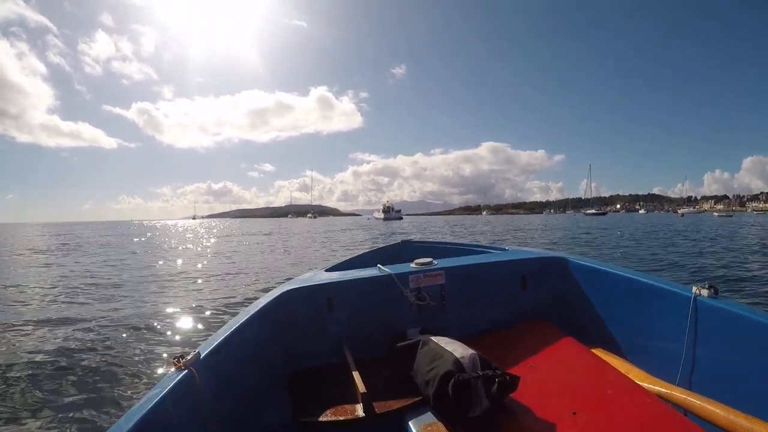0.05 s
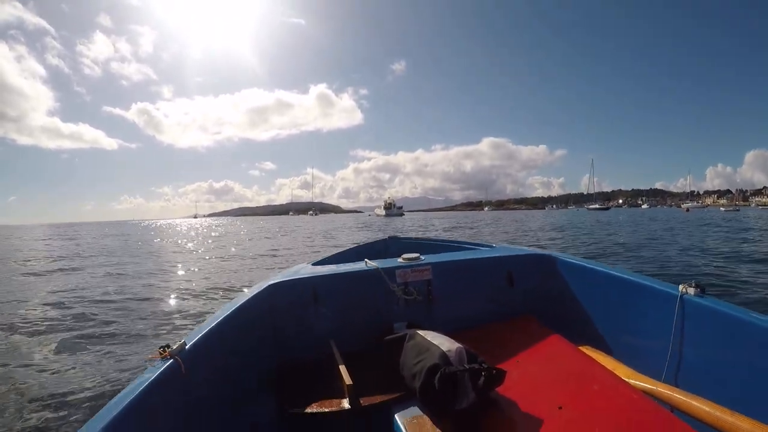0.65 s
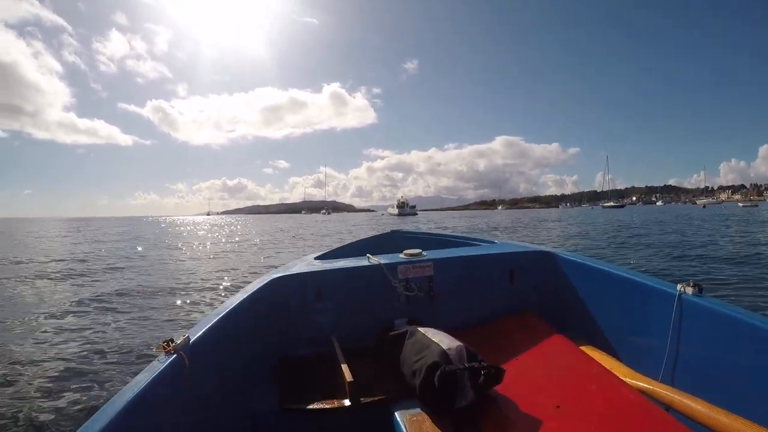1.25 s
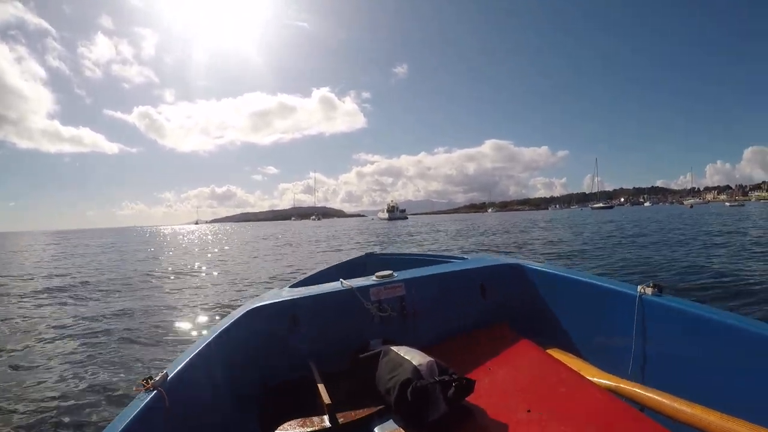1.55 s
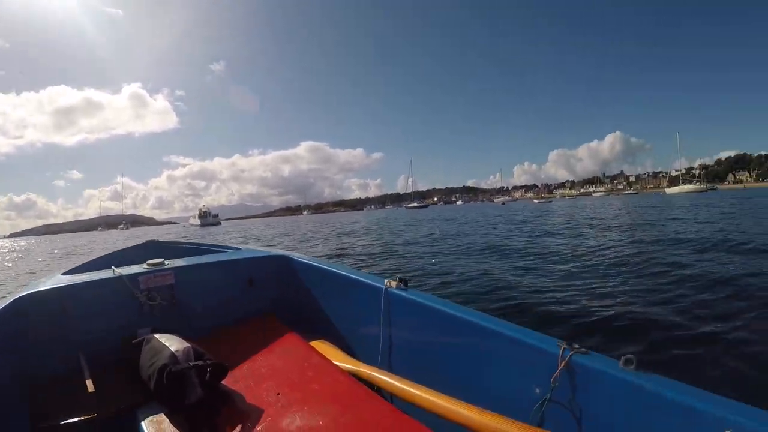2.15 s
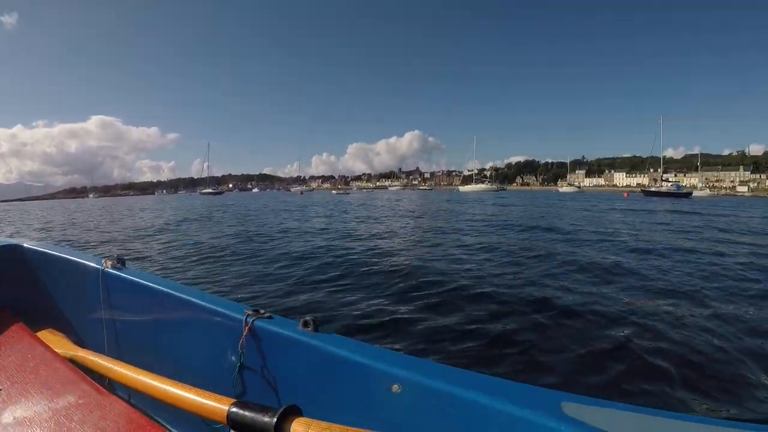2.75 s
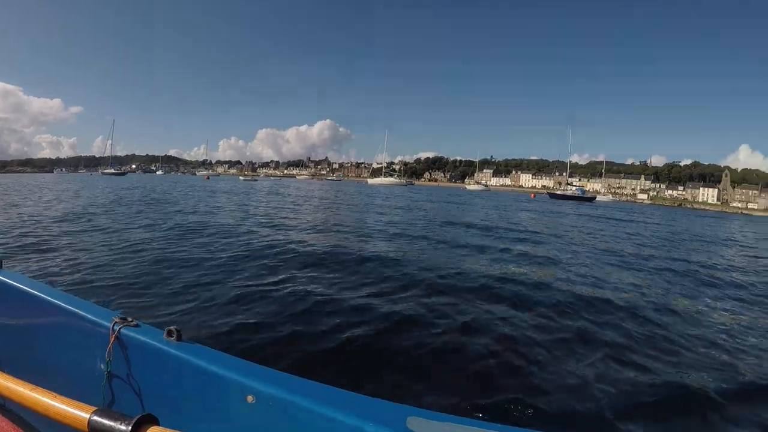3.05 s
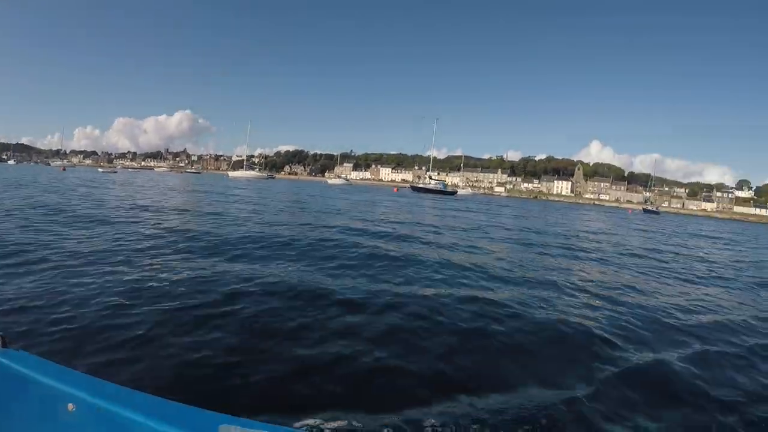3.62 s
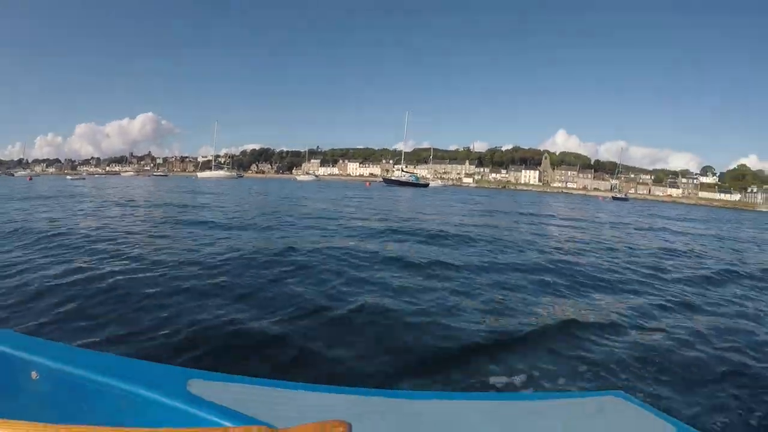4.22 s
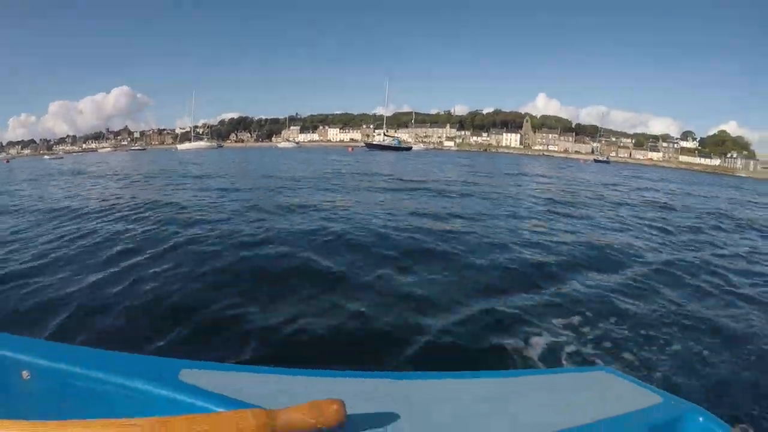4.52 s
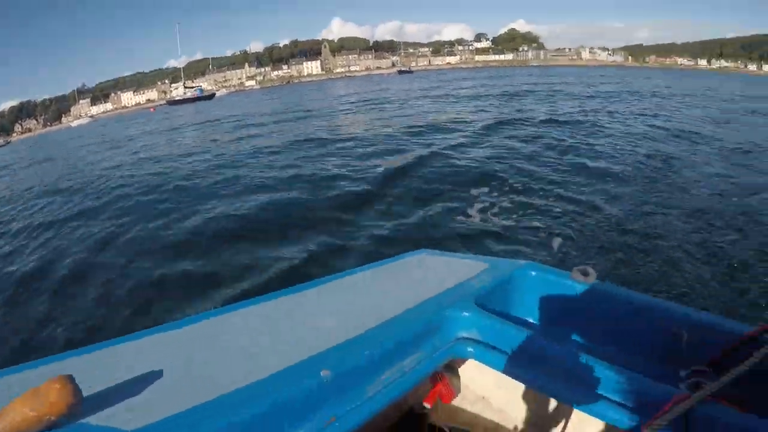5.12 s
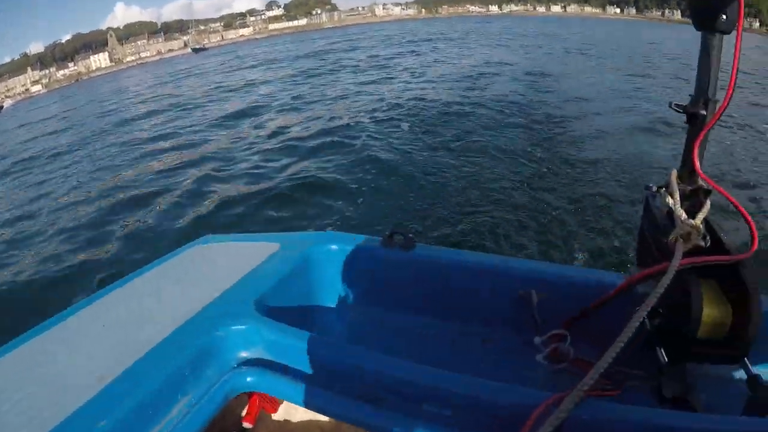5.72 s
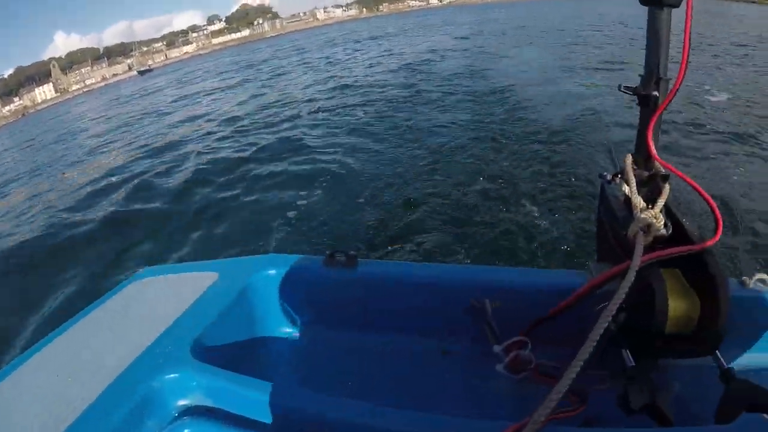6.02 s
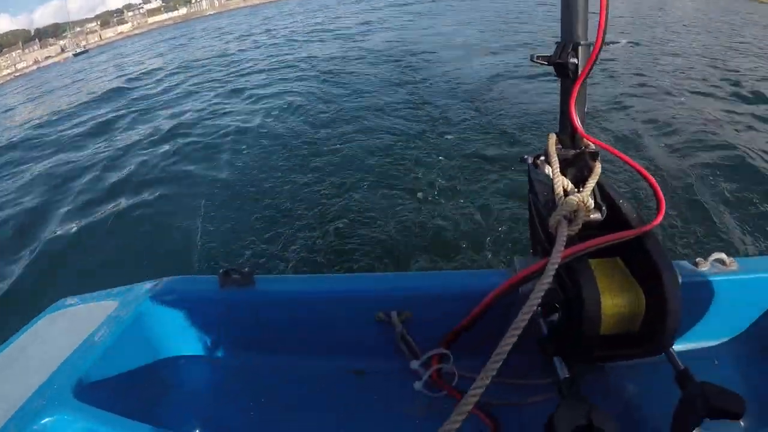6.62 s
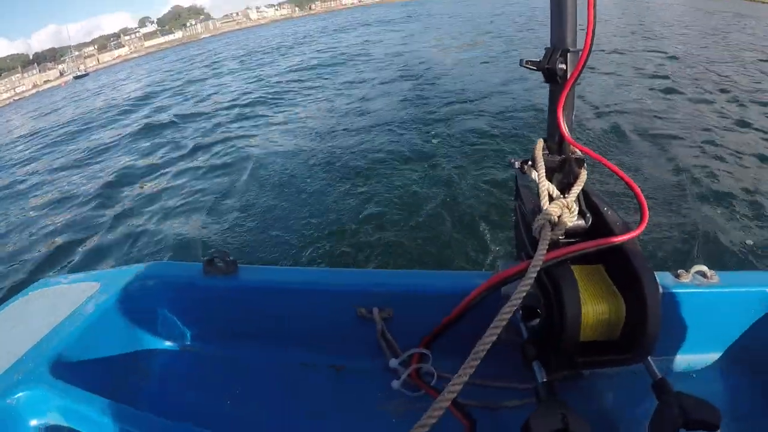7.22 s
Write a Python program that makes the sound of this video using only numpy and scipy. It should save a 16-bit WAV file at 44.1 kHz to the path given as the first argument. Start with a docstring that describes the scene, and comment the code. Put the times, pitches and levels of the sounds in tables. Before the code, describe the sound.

Water laps and plops against a dinghy over the low, pulsing hum of its electric outboard, a faint whine and gusty wind rumble.

```python
"""Electric dinghy on calm water

A dinghy glides under an electric outboard while the microphone turns from bow to stern.
The propeller sets the hull humming and throbbing, the motor whines faintly, wind rumbles on the mic.
Wavelets slap and gurgle along the hull, swells thump the bow, drops tick, the wake churns and fizzes.
The water is ringing bubbles and bands of noise; the hull answers with its resonances."""
import sys
import numpy as np
from scipy import signal
from scipy.io import wavfile
from scipy.ndimage import uniform_filter1d

SR = 44100
rng = np.random.default_rng(int(sys.argv[2]) if len(sys.argv) > 2 else 0)


def file_out(sig):
    """Save sig as 16-bit WAV at sys.argv[1]."""
    # one column per channel
    cols = np.atleast_2d(sig).T
    # limit, then scale
    lim = np.clip(cols, -1, 1)
    pcm = np.round(lim * 32767).astype(np.int16)
    wavfile.write(sys.argv[1], SR, pcm)


N = 320607
T = np.arange(N) / SR


def from_db(db):
    """Decibels to gain."""
    return 10 ** (np.asarray(db) / 20)


def rms_one(x):
    """Scale to unit rms; a stereo pair by its mid."""
    return x / np.sqrt(np.mean(np.atleast_2d(x).mean(axis=0) ** 2) + 1e-20)


def in_time(rows):
    """One per-sample curve for each column after time."""
    times, *columns = np.transpose(rows)
    return [np.interp(T, times, column) for column in columns]


def at_hz(spectrum, hz):
    """Read a spectrum on a log-frequency axis."""
    freqs, values = np.transpose(spectrum)
    return np.interp(np.log(hz), np.log(freqs), values)


def drift(rate_hz):
    """Slow random wander, rms 1."""
    hop, settle = 40, 2000
    r = np.exp(-2 * np.pi * rate_hz * hop / SR)
    slow = signal.lfilter([1], [1, -2 * r, r * r], rng.standard_normal(N // hop + settle + 2))[settle:]
    return np.interp(np.arange(N) / hop, np.arange(len(slow)), rms_one(slow))


def surges(rows):
    """Gain curve of bell-shaped surges, summed in power."""
    return np.sqrt(sum(from_db(db) ** 2 * np.exp(-np.minimum((2 * (T - peak_s) / length_s) ** 2, 50))
                       for peak_s, db, length_s in rows))


def resonate(x, hz, width_hz):
    """Two-pole resonance, unit peak gain."""
    r = np.exp(-np.pi * width_hz / SR)
    poles = [1, -2 * r * np.cos(2 * np.pi * hz / SR), r * r]
    return signal.lfilter(np.array([1, 0, -1]) * (1 - r * r) / 2, poles, x + 1e-18)


def narrow_noise(hz, width_hz, skirt_hz):
    """Two unrelated noises, each through a resonance and a wider one."""
    return resonate(resonate(rng.standard_normal((2, N)), hz, width_hz), hz, skirt_hz)


def steady(x, samples, amount):
    """Even out the envelope by an amount 0-1; rms 1."""
    envelope = np.sqrt(uniform_filter1d(rms_one(x) ** 2, size=samples) + 1e-3)
    return rms_one(x / envelope ** amount)


def panned(left_db):
    """Channel gains for a left-minus-right level."""
    gains = from_db(np.array([[1], [-1]]) * left_db / 2)
    return gains / gains.mean(axis=0)


def stereo(mid, side, correlation):
    """Two unrelated signals to a pair of given correlation."""
    return np.sqrt(1 + correlation) * mid + np.sqrt(1 - correlation) * side * np.array([[1], [-1]])


def spread(pair, width):
    """Narrow or widen a stereo pair."""
    mid = pair.mean(axis=0)
    return mid + width * (pair - mid)


def add(out, start_s, sound):
    """Mix in a short stereo sound."""
    at = max(0, int(start_s * SR))
    out[:, at:at + sound.shape[1]] += sound[:, :N - at]


# Likeness of the channels: (frequency [Hz], correlation [-1..1])
CORRELATION = [(25, -0.42), (70, 0.63), (130, 0.47), (250, 0.037), (500, 0.055), (1000, -0.76),
               (2000, -0.15), (4000, 0.28), (8000, -0.26), (13000, 0.14)]
def turbulence(spectrum, patchy_db, flicker_hz):
    """Stereo noise in narrow bands, each flickering partly on its own; rms 1."""
    edges = np.geomspace(spectrum[0][0], spectrum[-1][0], len(spectrum) * 2 + 1)
    out, common, white = 0, drift(flicker_hz), rng.standard_normal((2, 2, N))
    for k, band in enumerate(zip(edges, edges[1:])):
        mid, side = signal.sosfilt(signal.butter(2, band, "band", fs=SR, output="sos"), white[k % 2])
        hz = np.sqrt(band[0] * band[1])
        gain = from_db(at_hz(spectrum, hz) + patchy_db * (common + drift(flicker_hz)))
        out += gain * stereo(mid, side, at_hz(CORRELATION, hz))
    return rms_one(out)


def bubble(hz, t60_s, rise, left_lag_s):
    """Trapped air rings, rising in pitch as it nears the surface."""
    t = np.arange(int((t60_s + abs(left_lag_s)) * SR) + 2) / SR
    delay_s = np.maximum([[left_lag_s], [-left_lag_s]], 0)
    age = np.maximum(t - delay_s, 0)
    envelope = 1.16 * (1 - np.exp(-age * hz / 0.63)) * from_db(-60 * age / t60_s)
    return envelope * np.sin(2 * np.pi * hz * (age + rise * age * age / (2 * t60_s)))


def bubble_cloud(spectrum, per_s, ring_cycles, spread_db, clump_db):
    """Small bubbles born in clumps, their levels following a spectrum; rms 1."""
    out, births = np.zeros((2, N)), np.cumsum(from_db(clump_db * drift(7)))
    low_hz, high_hz = spectrum[1][0], spectrum[-2][0]
    for when, pitch, size, rise, lag, side in rng.random((int(per_s * N / SR), 6)):
        hz = low_hz * (high_hz / low_hz) ** pitch
        db = at_hz(spectrum, hz) + spread_db * min(-np.log(1 - size), 3)
        ring = hz * from_db(db) * bubble(hz, ring_cycles / hz, 0.32 * rise, 0.00063 * (lag - 0.5))
        add(out, np.searchsorted(births, when * births[-1]) / SR, ring * panned(8 * (side - 0.5)))
    return rms_one(out)


def splat(hz, width_hz, t60_s):
    """The surface breaks: a rough burst around one pitch; peak 1."""
    t = np.arange(int(t60_s * SR) + 200) / SR
    envelope = (1 - np.exp(-t * hz / 1.16)) * from_db(-60 * t / t60_s)
    burst = envelope * rng.standard_normal((2, len(t)))
    burst = stereo(*resonate(resonate(burst, hz, width_hz), hz, 2 * width_hz), 0.43)
    return burst / np.abs(burst).max()


# Hull throb, louder towards the stern: (time [s], level [dB])
THROB_LEVEL = [(0, -20), (.42, -26.5), (.55, -32), (1.05, -29), (1.6, -24.5), (1.75, -25.5), (2.2, -31),
               (2.58, -28.5), (2.7, -15), (2.86, -16), (3.04, -18.5), (3.22, -23.5), (3.65, -21.5),
               (4.3, -18.5), (4.65, -19), (4.82, -16.5), (5.0, -12.5), (5.1, -15), (5.29, -18),
               (5.45, -23.5), (5.71, -9.5), (5.8, -16.5), (5.94, -17.5), (6.04, -23.5), (6.16, -14.5),
               (6.4, -23), (6.54, -11.5), (6.66, -12), (6.8, -19.5), (7.0, -15.5), (7.27, -16.5)]
def hull_throb(shaft_angle, clean_share, hum_hz=91.83, shake_db=-11, dip_db=4):
    """The hull hums just above the blade rate and shakes once a turn; water stirs its lowest mode."""
    (level_db,) = in_time(THROB_LEVEL)
    hum = np.sin(2 * np.pi * np.cumsum(hum_hz * (1 + 0.0057 * drift(2.75))) / SR)
    shake = from_db(shake_db) * np.sin(shaft_angle)
    mid, side = narrow_noise(hz=96, width_hz=15, skirt_hz=60)
    boom = rms_one(stereo(steady(mid, samples=2000, amount=0.96), rms_one(side), 0.5))
    throb = np.sqrt(2 * clean_share) * (hum + shake) + np.sqrt(1 - clean_share) * boom
    sag_db = dip_db * np.clip(drift(8.7), 0, 2)
    return from_db(level_db - 1 - sag_db) * throb * panned(-0.73)


# Drone partials: (order [x shaft speed], level [dB])
SHAFT_ORDERS = [(3, -22.5), (4, -16), (5, -27.5), (6, -28.5), (8, -28), (12, -31)]
def drone(shaft_angle, flutter_db=3):
    """Multiples of the shaft speed, each fluttering in level."""
    out = np.zeros(N)
    for order, db in SHAFT_ORDERS:
        gain = from_db(db + flutter_db * drift(4.4))
        out += gain * np.sin(order * shaft_angle + rng.uniform(0, 2 * np.pi))
    return out


# Upper tone, rising as the motor comes into view: (time [s], level re lower tone [dB])
UPPER_TONE = [(5.9, -12), (6.6, -5), (7.27, 2)]
def whine(shaft_angle, lower_order=88, upper_order=92, flutter_db=0.7):
    """Two magnetic tones at high shaft orders, wavering separately in each channel."""
    (upper_db,) = in_time(UPPER_TONE)
    waver_rad = 1.32 * np.array([drift(13), drift(13)])
    lower = np.sin(lower_order * shaft_angle + waver_rad)
    upper = from_db(upper_db) * np.sin(upper_order * shaft_angle + waver_rad)
    return from_db(flutter_db * drift(14)) * (lower + upper) * panned(-2)


# Propeller shaft: (time [s], speed [rev/s])
SHAFT_SPEED = [(0, 45.3), (1.9, 45.6), (3.3, 45.15), (5.3, 45.23), (5.7, 45.0), (6.0, 45.42), (6.38, 45.72),
               (6.68, 45.15), (7.0, 45.24), (7.27, 45.0)]
# Motor balance: (time [s], drone [dB], whine [dB], clean share of throb [0-1])
MOTOR_MIX = [(0, -20, -84, 0.72), (.6, -25.5, -74, 0.5), (2.5, -26, -69, 0.76), (2.8, -26, -75, 0.97),
             (3.08, -26, -77, 1), (3.3, -22, -81, 0), (4.3, -21, -80, 0.35), (4.75, -23, -76, 0.8),
             (4.98, -26, -70, 0.99), (5.17, -19.5, -55, 0.75), (5.45, -18, -59, 0.74),
             (5.75, -21, -65, 0.97), (5.95, -21.5, -68, 0.9), (6.06, -23, -58.5, 0.67),
             (6.3, -21.5, -66, 0.54), (6.52, -22.5, -61, 1), (7.0, -15.5, -64.5, 0.85),
             (7.27, -24.5, -63, 0.84)]
def outboard(wobble=0.000685):
    """The turning shaft drives the hull throb, the drone and the whine."""
    (rev_per_s,) = in_time(SHAFT_SPEED)
    drone_db, whine_db, clean_share = in_time(MOTOR_MIX)
    angle = 2 * np.pi * np.cumsum(rev_per_s * (1 + wobble * drift(2.4))) / SR
    tones = from_db(drone_db - 4.5) * drone(angle) + from_db(whine_db) * whine(angle)
    return hull_throb(angle, clean_share) + np.sqrt(2) * tones


# Dull hull noise: (frequency [Hz], density [dB])
DRUMMING_SPECTRUM = [(100, 1), (125, 4), (170, -6.5), (240, -10.5), (380, -18)]
def drumming(mean_db=-33.5, follow=0.35):
    """Passing water drums on the hull, a little louder when it throbs."""
    (throb_db,) = in_time(THROB_LEVEL)
    level_db = mean_db + follow * (throb_db - throb_db.mean())
    noise = turbulence(DRUMMING_SPECTRUM, patchy_db=2.5, flicker_hz=8.9)
    return from_db(level_db) * spread(noise, width=0.2)


# Wind rumble: (time [s], level [dB])
WIND_LEVEL = [(0, -31.5), (.24, -27.5), (.55, -35), (1.0, -39.5), (1.25, -32.5), (1.5, -34), (1.67, -35),
              (1.9, -37), (2.55, -31.5), (3.1, -27.5), (4.35, -27), (4.9, -31.5), (5.6, -28.5),
              (5.9, -25.5), (6.12, -36), (6.45, -27.5), (7.27, -33)]
# Gusts, plus the low body of the big wavelet slap at 1.38 s, as surges of buffeting: (peak time [s], level
# [dB], length [s])
WIND_GUSTS = [(.24, -25, 0.086), (.43, -36, 0.028), (1.38, -29.5, 0.093), (2.7, -35, 0.082),
              (3.3, -25, 0.41), (3.78, -24, 0.13), (3.99, -20, 0.24), (5.6, -28, 0.23), (5.93, -28, 0.22),
              (6.95, -39, .2)]
# Rumble and buffeting: (frequency [Hz], density [dB])
RUMBLE_SPECTRUM = [(12, -3), (25, -10), (42, -9.5), (70, -10.5), (110, -17), (150, -27.5), (250, -42)]
BUFFET_SPECTRUM = [(70, -3), (115, 1.5), (160, -2), (220, -4), (320, -15.5), (450, -25), (800, -36),
                   (1600, -64)]
def wind(pan_db):
    """Deep rumble on the mic ports; higher buffeting follows it and flares in gusts and under the big slap."""
    (level_db,) = in_time(WIND_LEVEL)
    rumble = from_db(level_db + 5) * turbulence(RUMBLE_SPECTRUM, patchy_db=0.8, flicker_hz=9.2)
    buffet_gain = np.hypot(from_db(level_db - 14.5), surges(WIND_GUSTS))
    buffet = buffet_gain * turbulence(BUFFET_SPECTRUM, patchy_db=1.5, flicker_hz=24)
    return rumble * panned(pan_db) + spread(buffet, width=1.6) * panned(1.12 * pan_db)


# Wash: (time [s], level [dB])
HULL_WASH = [(0, -44), (.26, -45.5), (.5, -45.5), (.95, -46), (1.3, -43), (2.25, -42), (2.48, -45.5),
             (2.7, -41.5), (2.88, -44.5), (3.3, -45.5), (4.6, -45), (4.9, -43), (6.3, -45), (7.27, -44.5)]
# Wash: (frequency [Hz], density [dB])
WASH_SPECTRUM = [(230, -4), (370, 0.5), (560, -0.5), (750, -1), (1050, -2.5), (1400, -7), (2200, -33.5)]
def wash():
    """Water runs along the hull: bubbles over a smooth rush."""
    (level_db,) = in_time(HULL_WASH)
    rush = turbulence(WASH_SPECTRUM, patchy_db=0.05, flicker_hz=13)
    bubbles = bubble_cloud(WASH_SPECTRUM, per_s=210, ring_cycles=61, spread_db=3, clump_db=2.5)
    return from_db(level_db) * (from_db(-5.5) * rush + from_db(-4.5) * bubbles) * panned(-0.5)


def spray(per_s=55, spread_db=3, low_hz=2400, high_hz=6800):
    """Fine drops patter down at random; rms 1."""
    out = np.zeros((2, N))
    for when, pitch, size in rng.random((int(per_s * N / SR), 3)):
        tick = splat(low_hz + pitch * (high_hz - low_hz), width_hz=1300, t60_s=0.017)
        add(out, when * N / SR, from_db(spread_db * min(-np.log(1 - size), 3)) * tick)
    return rms_one(out)


# Splashing, strongest astern: (time [s], level [dB])
SPLASH_LEVEL = [(0, -52.5), (.5, -60), (1.05, -58), (1.4, -56.5), (2.4, -57), (4.65, -56.5), (4.9, -53),
                (6.6, -52), (7.27, -55)]
# Tumbling crests: (peak time [s], level [dB], length [s])
SPLASH_CRESTS = [(.24, -54.5, 0.18), (.72, -53.5, 0.3), (1.16, -47, 0.015), (1.255, -49, 0.026),
                 (1.33, -48, 0.052), (1.67, -49.5, 0.6), (2.16, -58, 0.02), (2.7, -64, 0.078),
                 (3.05, -50.5, 0.094), (6.03, -48, 0.06), (6.4, -50, 0.062), (6.56, -52, 0.076)]
# Stereo image, narrowing towards the wake: (time [s], width [x])
SPLASH_IMAGE = [(0, 0.61), (4.5, 1.05), (5.8, 0.75), (6.6, 0.32), (7.27, 0.54)]
# Splashing: (frequency [Hz], density [dB])
SPLASH_SPECTRUM = [(900, -24), (1500, 5), (2200, 2.5), (2800, -1), (3900, -6.5), (4800, -13.5), (7000, -45)]
def splashing():
    """Hiss and small bubbles surge with each crest; spray grows faster than the splashing throwing it."""
    (level_db,), (width,) = in_time(SPLASH_LEVEL), in_time(SPLASH_IMAGE)
    spray_db = level_db.mean() - 6 + 1.3 * (level_db - level_db.mean())
    bubble_share = np.clip(0.44 + 0.024 * (spray_db + 54.5), 0.15, 0.75)
    hiss = turbulence(SPLASH_SPECTRUM, patchy_db=2.5, flicker_hz=18)
    bubbles = bubble_cloud(SPLASH_SPECTRUM, per_s=330, ring_cycles=44, spread_db=6, clump_db=3.5)
    splash = np.sqrt(1 - bubble_share) * hiss + np.sqrt(bubble_share) * bubbles
    gain = np.hypot(from_db(level_db + 1.5), surges(SPLASH_CRESTS))
    return spread(gain * splash + from_db(spray_db) * spray(), width) * panned(2.5)


# Foam, loudest facing the wake: (time [s], level [dB])
FOAM_LEVEL = [(0, -58), (.35, -60.5), (.68, -54.5), (1.03, -61), (1.3, -56.5), (1.8, -57.5), (2.13, -55),
              (2.4, -58), (2.95, -53.5), (3.55, -57), (4.28, -52), (4.7, -54.5), (4.95, -46.5), (5.8, -46),
              (6.2, -54.5), (7.27, -55)]
# Foam: (frequency [Hz], density [dB])
FOAM_SPECTRUM = [(3000, -8.5), (4700, -7.5), (5800, -1), (7200, 0.5), (8300, -7.5), (10000, -10),
                 (11500, -18.5), (14000, -21.5)]
def foam():
    """The smallest bubbles fizz over a high hiss."""
    (level_db,) = in_time(FOAM_LEVEL)
    hiss = turbulence(FOAM_SPECTRUM, patchy_db=1.24, flicker_hz=25)
    bubbles = bubble_cloud(FOAM_SPECTRUM, per_s=440, ring_cycles=23, spread_db=-0.5, clump_db=2)
    return from_db(level_db) * (from_db(-1.5) * hiss + from_db(-8.5) * bubbles) * panned(1)


# Large bubbles: (time [s], pitch [Hz], level [dB], splashiness [0-1])
LARGE_BUBBLES = [(.136, 1074, -31.5, 0.6), (.175, 1300, -35, 0.9), (.275, 1450, -31, 0.7),
                 (.407, 780, -40, 0.5), (0.646, 1100, -31.5, 0.35), (.755, 3480, -34, 0.8),
                 (0.764, 1246, -33, 0.7), (.793, 480, -33, 0.3), (.881, 833, -34, 0.7),
                 (.914, 853, -34, .4), (0.929, 966, -32.5, 0.08), (1.098, 934, -32.5, 0.5),
                 (1.165, 404, -25.5, 0.27), (1.205, 977, -32, 0.76), (1.253, 663, -31, 0.35),
                 (1.32, 1120, -22.5, 0.65), (1.325, 794, -24, 0.6), (1.343, 505, -22.5, 0.7),
                 (1.347, 328.4, -24, 1), (1.344, 1650, -33, 0.7), (1.397, 850, -31.5, 0.9),
                 (1.672, 2250, -30.5, 0.9), (1.83, 1035, -33.5, 0.5), (1.867, 1320, -31.5, 0.2),
                 (2.2, 705, -32, .8), (2.343, 2466, -35.5, 0.3), (2.403, 653, -28.5, 0.26),
                 (2.577, 1210, -32, 0.7), (2.596, 1180, -34, .6), (2.626, 1246, -35, .4),
                 (2.672, 2270, -34.5, .45), (2.685, 597, -30, 1), (2.716, 760, -28.5, 0.5),
                 (2.958, 1640, -39, 0.2), (2.988, 533, -27.5, 0.04), (3.632, 540, -33, 0.03),
                 (3.792, 1760, -30, 0.5), (3.85, 643, -25, 0.46), (4.063, 734, -35, 0.5),
                 (4.79, 725, -29.5, 0), (4.791, 1850, -33, 0.7), (5.052, 1900, -30, .8),
                 (5.471, 1000, -28, 0.5), (5.494, 2170, -32, 0), (5.991, 1130, -32, 0.6),
                 (6.014, 1920, -32, 1), (6.162, 614, -45, 0), (6.32, 955, -30.5, 0), (6.356, 588, -27, 0.1),
                 (6.389, 999, -32.5, 0.3), (6.445, 2080, -34.5, .6), (6.533, 1830, -34, 0.5),
                 (6.607, 888, -32.5, 0), (6.709, 610, -41, 0.2), (6.687, 2170, -33.5, 0.7),
                 (6.711, 2360, -31, 0.35), (6.861, 507, -33, 0.1), (6.903, 455, -28.5, 0),
                 (6.913, 2250, -24, 0.12), (6.916, 920, -32, 0), (6.921, 1880, -37, 0.3),
                 (7.014, 407, -28, 0.7), (7.051, 1950, -36, 0.1), (7.116, 1707, -31, 0.8)]
def plops(rise=0.054, trail_s=0.055, trail_count=7):
    """A folding wavelet splats and sheds a large bubble; smaller ones gurgle after it."""
    out = np.zeros((2, N))
    for start_s, hz, db, splashy in LARGE_BUBBLES:
        t60_s = 0.0718 * (1000 / hz) ** 0.83
        ring = bubble(hz * (1 - rise / 6), t60_s, rise, rng.normal(0, 0.21) / hz)
        add(out, start_s, np.sqrt(1 - splashy) * from_db(db + 0.6) * ring)
        splash_gain = np.sqrt(splashy) * from_db(db)
        add(out, start_s, splash_gain * splat(hz, 0.25 * hz, 1.5 * t60_s))
        for late in rng.random(trail_count):
            pitch, size, lag = rng.standard_normal(3)
            small_hz = hz * np.exp(0.239 * np.clip(pitch, -2, 2))
            small = bubble(small_hz, 0.436 * t60_s, rise, 0.00028 * lag)
            add(out, start_s + trail_s * late, splash_gain * from_db(2 * size - 6.5 - 8.6 * late) * small)
    return out


# Wavelet impacts: (time [s], level [dB], t60 [s])
WAVELETS = [(0.138, -29.5, 0.048), (.199, -38, 0.12), (0.268, -32, 0.11), (.406, -39, 0.029),
            (.766, -39, 0.17), (0.881, -38, 0.15), (1.151, -32, 0.17), (1.251, -27, 0.031),
            (1.317, -24, 0.072), (1.34, -25, 0.15), (1.394, -39.5, 0.42), (2.147, -33, 0.25),
            (2.332, -29.5, 0.049), (2.679, -30, 0.09), (2.716, -31, 0.1), (2.954, -38, 0.75),
            (3.065, -33, 0.086), (3.184, -32.5, 0.07), (3.632, -35, 0.088), (3.934, -37, 0.27),
            (4.788, -36.5, 0.56), (5.474, -39, 0.11), (7.013, -32, 0.031)]
# Hull resonances: (frequency [Hz], width [Hz], gain [dB])
HULL_MODES = [(185, 30, -14), (253, 100, 6.5), (347, 66, 9), (462, 84, 7), (645, 49, 4), (820, 190, -3.5),
              (1200, 740, -3), (1525, 235, 0.5), (2450, 4200, -25)]
def slaps(attack_s=0.002, lowpass_hz=7000):
    """Each wavelet excites the hull resonances with a short, soft burst."""
    envelope = np.zeros(N)
    for start_s, db, t60_s in WAVELETS:
        age = np.clip(T - start_s, 0, 2 * t60_s)
        envelope += from_db(db - 60 * age / t60_s) * (1 - np.exp(-age / attack_s))
    noise = stereo(*rng.standard_normal((2, N)), 0.54)
    push = signal.sosfilt(signal.butter(2, lowpass_hz, fs=SR, output="sos"), noise)
    body = sum((-1) ** k * from_db(db) * resonate(push, hz, width_hz)
               for k, (hz, width_hz, db) in enumerate(HULL_MODES))
    return envelope * rms_one(body)


# Swells at the bow: (time [s], level [dB])
BOW_SWELLS = [(.254, -17), (.425, -14), (1.342, -16)]
# Low hull modes: (frequency [Hz], gain [dB], t60 [s])
LOW_MODES = [(96, 0, 0.08), (145.6, -4, 0.11), (276, -28, 0.043)]
def thumps(lowpass_hz=500):
    """A swell's blunt push on the bow rings the lowest hull modes for a few cycles."""
    out = np.zeros(N)
    for start_s, db in BOW_SWELLS:
        age = np.clip(T - start_s, 0, 0.4)
        for hz, mode_db, t60_s in LOW_MODES:
            out += from_db(db + mode_db - 60 * age / t60_s) * np.sin(2 * np.pi * hz * age)
    return signal.sosfilt(signal.butter(1, lowpass_hz, fs=SR, output="sos"), out)


# Big drops: (time [s], pitch [Hz], level [dB], tick width [Hz])
BIG_DROPS = [(1.103, 6240, -43, 1500), (1.158, 5900, -43, 1500), (1.248, 3100, -40, 1500),
             (1.257, 5700, -41, 2200), (1.301, 6000, -39, 900), (1.311, 3460, -41, 1200),
             (1.906, 5850, -42, 1400), (1.969, 6640, -37, 1200), (2.119, 6360, -40, 1200),
             (2.132, 6650, -40, 1200), (2.295, 6700, -33, 2490), (2.369, 5800, -39, 1180),
             (2.902, 6600, -38.5, 2000), (3.119, 5600, -36.5, 900), (3.141, 4650, -35.5, 600),
             (3.352, 5930, -35.5, 700), (3.686, 5900, -34.5, 2200), (5.09, 7260, -34, 1500),
             (5.438, 7000, -32, 1500), (5.829, 3750, -35, 900), (5.993, 5890, -36, 1400),
             (6.104, 5200, -33, 1000), (6.438, 6360, -42.5, 1200), (6.465, 5840, -39, 2200),
             (6.63, 5900, -31, 2200), (6.648, 5450, -37, 1800), (6.676, 4200, -37, 1500),
             (6.864, 3200, -35.5, 1200), (6.89, 6100, -38, 1500), (7.159, 3370, -37, 900),
             (7.164, 5880, -32, 1400)]
def droplets():
    """A drop lands with a tick and rings a pinhead bubble."""
    out = np.zeros((2, N))
    for start_s, hz, db, width_hz in BIG_DROPS:
        add(out, start_s, from_db(db + 3) * splat(hz, width_hz, t60_s=0.024))
        add(out, start_s, from_db(db - 6) * bubble(hz, t60_s=0.012, rise=0.058, left_lag_s=2e-5))
    return out


# Soft hiss: (time [s], level [dB])
SWISH_LEVEL = [(3.0, -100), (3.17, -59.5), (3.45, -58.5), (3.62, -86)]
def swish():
    """A brief hiss in one narrow band."""
    (level_db,) = in_time(SWISH_LEVEL)
    hiss = narrow_noise(hz=3230, width_hz=420, skirt_hz=840)
    return from_db(level_db) * rms_one(stereo(*hiss, 0.4))


# Air pocket hoots: (peak time [s], level [dB], length [s])
POCKET_HOOTS = [(3.05, -35.5, 0.11), (3.335, -38, 0.043), (3.68, -38, 0.051), (5.53, -41, 0.065)]
def glugs():
    """Water works an air pocket under the hull, which hoots at its own pitch."""
    hoot, _ = narrow_noise(hz=555, width_hz=32, skirt_hz=96)
    return surges(POCKET_HOOTS) * steady(hoot, samples=600, amount=0.51)


# Churn behind the propeller: (time [s], level [dB])
WAKE_LEVEL = [(4.5, -85), (5.4, -53.5), (6.0, -48.5), (7.27, -49)]
# Churn bubbles: (frequency [Hz], level [dB])
WAKE_SPECTRUM = [(380, 2), (450, 2), (1000, -0.5), (1500, -6), (2200, -8.5), (3500, -12)]
def churn():
    """The propeller stirs up a gurgle of larger bubbles."""
    (level_db,) = in_time(WAKE_LEVEL)
    bubbles = bubble_cloud(WAKE_SPECTRUM, per_s=110, ring_cycles=41, spread_db=2.5, clump_db=1.5)
    return from_db(level_db) * bubbles


# Left-minus-right balance: (time [s], water [dB], wind [dB])
BALANCE = [(0, -5.5, -9), (.7, -5, -3.5), (1.3, -5.5, -2), (2.5, -5, 2.5), (3.3, -5, 0.5), (4.1, -6, 4.5),
           (4.7, -5.5, 2), (5.5, -6.5, -3.5), (7.27, -4, -10)]
def scene():
    """Water lies mostly to the right; wind shifts from side to side as the mic turns."""
    water_pan_db, wind_pan_db = in_time(BALANCE)
    water = wash() + splashing() + foam() + plops() + slaps() + thumps()
    water += droplets() + swish() + glugs() + churn()
    return outboard() + drumming() + wind(wind_pan_db) + water * panned(water_pan_db)


def record(dry, highpass_hz=10, lowpass_hz=14800):
    """Cut the deepest bass and the top."""
    dry = signal.sosfilt(signal.butter(2, highpass_hz, "high", fs=SR, output="sos"), dry)
    return signal.sosfilt(signal.ellip(10, 0.1, 80, lowpass_hz, fs=SR, output="sos"), dry)


dry = scene()
out = record(dry)
file_out(out)
```